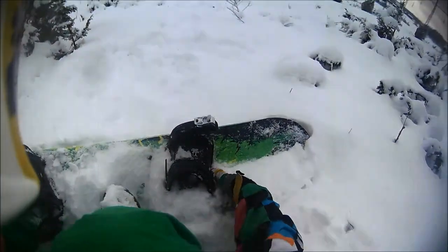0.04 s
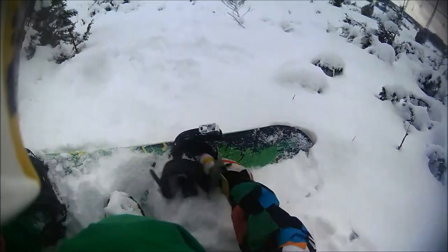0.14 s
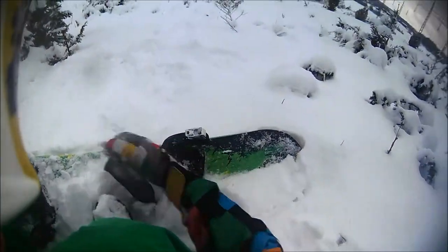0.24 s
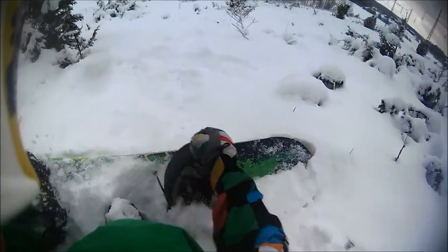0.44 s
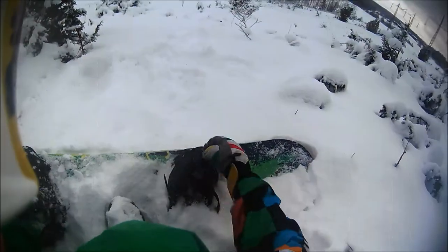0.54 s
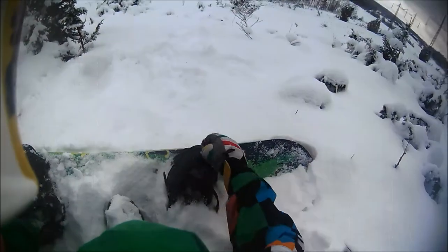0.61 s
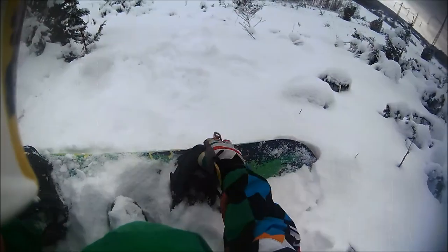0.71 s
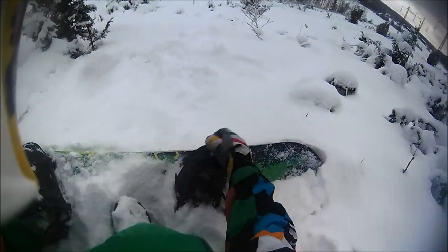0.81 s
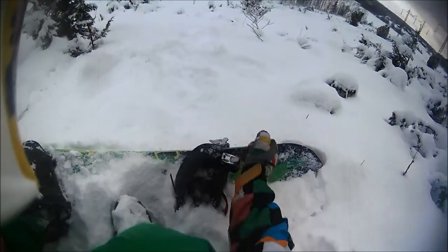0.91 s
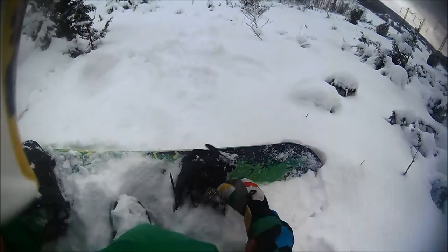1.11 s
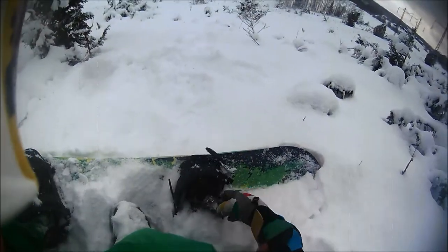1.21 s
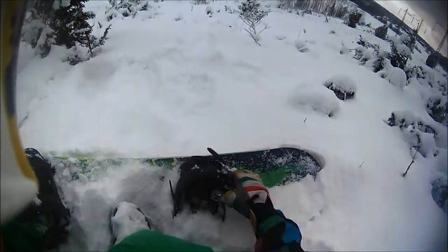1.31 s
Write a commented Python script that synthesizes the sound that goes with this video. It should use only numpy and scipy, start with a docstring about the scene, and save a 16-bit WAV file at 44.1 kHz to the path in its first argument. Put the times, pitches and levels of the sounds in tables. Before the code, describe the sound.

A snowboard binding strap ratchets briefly, then plastic clicks and a glove rustles.

```python
"""A toothed snowboard-binding strap zips through its buckle, each tooth snapping past the pawl
faster than the last. Plastic parts click and ring the buckle and frame. A glove rubs over snow and
cloth, snow crystals tick and the arm bumps softly. A jacket stirs and faint wind rumbles on a
close, dull, body-worn microphone."""
import sys
import numpy as np
from scipy import signal
from scipy.fft import rfft, irfft, next_fast_len
from scipy.io import wavfile
from scipy.ndimage import uniform_filter1d

SR = 44100
rng = np.random.default_rng(int(sys.argv[2]) if len(sys.argv) > 2 else 0)


def int16_out(signal):
    """Quantize to a 16-bit WAV file."""
    q = np.round(np.clip(np.atleast_2d(signal).T, -1, 1) * 32767)
    wavfile.write(sys.argv[1], SR, q.astype(np.int16))


N = 59535


def undb(db):
    """Decibels to gain."""
    return 10 ** (np.asarray(db) / 20)


def unit(x):
    """Scale to rms 1."""
    return x / np.sqrt(np.mean(x ** 2) + 1e-20)


def since(start_s):
    """Seconds since start_s, zero before it."""
    return np.maximum(np.arange(N) / SR - start_s, 0)


def curve(table, column=1):
    """One table column, linearly interpolated over time."""
    rows = np.array(table)
    return np.interp(np.arange(N) / SR, rows[:, 0], rows[:, column])


def colour(x, points):
    """Minimum-phase filter through (freq_hz, gain_db) points."""
    size = 2 * next_fast_len(N)
    hz, db = np.array(points, float).T
    bins_hz = np.maximum(np.arange(size // 2 + 1) * SR / size, 1)
    gain = undb(np.interp(np.log(bins_hz), np.log(hz), db))
    cepstrum = irfft(np.log(gain))
    cepstrum[1:size // 2] *= 2
    cepstrum[size // 2 + 1:] = 0
    return irfft(rfft(x, size) * np.exp(rfft(cepstrum)))[:N]


def drift(rate_hz):
    """Smooth random fluctuation, rms 1."""
    hold = int(SR / rate_hz)
    steps = np.repeat(rng.standard_normal(N)[:N // hold + 1], hold)
    return unit(uniform_filter1d(uniform_filter1d(steps, hold), hold)[:N])


def grains(rate_per_s=3100, scatter_db=0.5):
    """Friction: dense tiny slips of random sign and slightly uneven strength."""
    slips = rng.random(N) < rate_per_s / SR
    signs = rng.choice([-1, 1], N)
    return slips * signs * undb(scatter_db * np.minimum(rng.exponential(size=N), 5))


def ring(start_s, modes, rise_s):
    """Damped modes (freq_hz, level_db, t60_s) of alternating sign, building during contact; peak 1."""
    age_s = since(start_s)[:int((start_s + .3) * SR)]
    y = np.zeros(len(age_s))
    for k, (hz, db, t60_s) in enumerate(modes):
        decay = np.exp(-np.log(1000) * age_s / t60_s)
        y += (-1) ** k * undb(db) * np.sin(2 * np.pi * hz * age_s) * decay
    y *= 1 - np.exp(-age_s / rise_s)
    return np.pad(y / np.abs(y).max(), (0, N - len(y)))


def at_pitch(modes, pitch_hz):
    """Mode ratios to frequencies."""
    return [(pitch_hz * ratio, db, t60_s) for ratio, db, t60_s in modes]


def wind(swing_db=4):
    """Gusts rumble on the microphone."""
    # time_s, level_db
    levels = [(.02, -33.5), (.09, -39), (.3, -38), (.36, -36), (.43, -41), (.5, -34), (.59, -30.5),
              (.68, -43), (.92, -45), (1.1, -39), (1.35, -46)]
    # freq_hz, gain_db
    spectrum = [(15, -7.5), (35, -3.5), (70, -4), (120, -5.5), (200, -12.5), (500, -39.5)]
    rumble = unit(colour(rng.standard_normal(N), spectrum))
    return rumble * undb(curve(levels) + swing_db * drift(rate_hz=7.9))


def jacket(level_db=-46.5, swing_db=1):
    """Jacket cloth stirs in constant quiet friction."""
    # freq_hz, gain_db
    spectrum = [(60, -8.5), (150, -3.5), (280, 1.5), (450, -8), (700, -9), (1100, -16.5), (2300, -27.5),
                (3200, -33), (5000, -36.5)]
    return unit(colour(grains(), spectrum)) * undb(level_db + swing_db * drift(rate_hz=34.71))


def bumps(t60_s=0.057):
    """Soft arm bumps, each one low, quickly damped mode."""
    # start_s, peak_db, pitch_hz
    hits = [(0.352, -17.5, 73), (0.545, -12.5, 108), (0.564, -27, 91), (0.852, -32, 119), (1.091, -35, 180),
            (1.137, -22.5, 81.5), (1.299, -34.5, 136)]
    return sum(undb(db) * ring(start_s, [(hz, 0, t60_s)], rise_s=0.0015) for start_s, db, hz in hits)


def crystals(decay_s=0.002):
    """Snow crystals break under the glove in short bright noise bursts."""
    # start_s, relative_db
    ticks = [(0.272, -15), (0.277, -14), (0.296, -30), (0.301, -36), (0.355, -26), (0.376, -24),
             (0.403, -18), (.513, -25.5), (0.55, -26), (0.945, -32), (1.216, -27.5)]
    # freq_hz, gain_db
    spectrum = [(1500, -29.5), (3000, -17.5), (5000, -12), (7300, -10.5), (9000, -15.5)]
    bursts = np.zeros(N)
    for start_s, db in ticks:
        age_s = since(start_s)
        bursts += undb(db) * (age_s > 0) * np.exp(-age_s / decay_s)
    return bursts * unit(colour(rng.standard_normal(N), spectrum)) / 2


def glove(swell_exponent=0.69):
    """Each stroke swells and fades: a dull rub on snow, a brighter rustle of cloth."""
    # start_s, length_s, rub_db, rustle_db
    strokes = [(-.012, 0.11, -31.5, -45.5), (0.075, 0.2, -36.5, -49.5), (0.314, 0.07, -36.5, -37),
               (0.356, 0.076, -42.5, -33.5), (0.435, 0.12, -30, -53.5), (0.516, .1, -30, -46),
               (.587, 0.011, -28.5, -37), (0.608, .1, -54.5, -62), (0.73, 0.047, -41, -52),
               (0.933, 0.1, -40.5, -51), (1.075, 0.076, -41, -49.5), (1.182, 0.084, -37.5, -58.5),
               (1.305, 0.13, -43, -58)]
    # freq_hz, gain_db
    rub_spectrum = [(40, -28), (150, -3), (300, 2.5), (600, -1), (900, -10.5), (1400, -20), (3000, -49)]
    # freq_hz, gain_db
    rustle_spectrum = [(250, -15), (700, -0.5), (1000, -1), (1500, -3), (2400, -7), (3200, -19.5),
                       (7000, -17.5)]
    rub_gain, rustle_gain = np.zeros(N), np.zeros(N)
    for start_s, length_s, rub_db, rustle_db in strokes:
        progress = np.minimum(since(start_s) / length_s, 1)
        swell = np.abs(np.sin(np.pi * progress)) ** swell_exponent
        rub_gain += undb(rub_db) * swell
        rustle_gain += undb(rustle_db) * swell
    rub = rub_gain * unit(colour(grains(), rub_spectrum))
    rustle = rustle_gain * unit(colour(grains(), rustle_spectrum))
    return rub + rustle


def clicks(crack_re_pawl_db=-13.5, crack_decay_s=0.0011):
    """Plastic impacts: the pawl cracks and ticks, the buckle knocks, the frame rings low."""
    # The hand's grip shifts the pitches.
    # start_s, frame_hz, frame_db, buckle_hz, buckle_db, pawl_db
    hits = [(.291, 237, -19.5, 573, -9, -44), (.498, 267, -27.5, 515, -36, -54),
            (.523, 300, -16.5, 553, -6.5, -19), (0.5404, 252, -29, 620, -15.5, -37.5),
            (0.5495, 248.5, -22, 516, -28, -34), (0.5907, 302, -26.5, 459, -17.5, -38),
            (0.598, 241, -29.5, 393, -39, -66), (.746, 240.6, -35, 670, -31.5, -42.5),
            (.9735, 208, -31, 940, -31, -23), (.976, 225, -27.5, 766, -16.5, -19.5),
            (1.005, 300.3, -19.5, 1040, -31, -46), (1.0184, 320, -40, 946, -35, -53),
            (1.023, 317, -21, 513, -30.5, -67), (1.068, 294, -48, 600, -38, -58),
            (1.155, 252.4, -24, 575, -30, -48), (1.216, 310, -37, 560, -34, -39),
            (1.228, 322.7, -30, 585, -46, -48), (1.2492, 297, -33, 961, -32, -51),
            (1.285, 238, -40.5, 306, -32.5, -61)]
    # pitch_ratio, level_db, t60_s
    frame_modes = [(.78, -12, .06), (1, 0, .095), (1.16, -9, .07), (1.85, -11, .08)]
    # pitch_ratio, level_db, t60_s
    buckle_modes = [(.82, 2.5, 0.023), (1, 2, 0.033), (1.33, 0.5, 0.02), (1.75, -11, 0.027),
                    (2.4, -14, .018)]
    # freq_hz, level_db, t60_s
    pawl_modes = [(1590, 4.5, 0.004), (1834, -4, 0.017), (2175, 1.5, 0.0071), (2667, -8, 0.01),
                  (3000, -4, .009), (4710, -13, 0.0057)]
    out = np.zeros(N)
    for start_s, frame_hz, frame_db, buckle_hz, buckle_db, pawl_db in hits:
        age_s = since(start_s)
        burst = (age_s > 0) * np.exp(-age_s / crack_decay_s)
        crack = undb(crack_re_pawl_db) * rng.standard_normal(N) * burst
        out += undb(frame_db) * ring(start_s, at_pitch(frame_modes, frame_hz), rise_s=0.0017)
        out += undb(buckle_db) * ring(start_s, at_pitch(buckle_modes, buckle_hz), rise_s=0.00083)
        out += undb(pawl_db) * (ring(start_s, pawl_modes, rise_s=0.00023) + crack)
    return out


def strap(rate_jitter=.045, scatter_db=1.6, scrape_decay_teeth=1):
    """Teeth snap past the pawl at a rising rate, each followed by a short scrape."""
    # time_s, teeth_per_s
    pull_speed = [(.2, 137.6), (.225, 166), (.24, 232), (.255, 250), (.267, 323), (.28, 327), (.292, 480),
                  (.3, 525)]
    # time_s, teeth_db, scrape_db
    pull_levels = [(.19, -52, -40), (.203, -41.5, -37), (.217, -21.5, -25.5), (.249, -19, -21),
                   (.257, -8.5, -21.5), (.272, -15.5, -13), (.281, -6, -14), (.291, -14.5, -23),
                   (.297, -32, -37), (.304, -23, -44)]
    # freq_hz, gain_db
    tooth_spectrum = [(40, -37), (130, -22), (210, 1.5), (370, -0.5), (500, -4.5), (640, -4), (740, -5),
                      (950, -14.5), (1700, -20.5), (2500, -25), (3500, -44.5)]
    # freq_hz, gain_db
    scrape_spectrum = [(150, -19), (450, 23.5), (800, 2), (1200, 14.5), (1800, 11), (2500, 0), (3200, -0.5),
                       (4800, -4.5), (7000, -22.5)]
    teeth_per_s = curve(pull_speed)
    travel_teeth = np.cumsum(teeth_per_s * (1 + rate_jitter * drift(rate_hz=250))) / SR
    tooth = travel_teeth.astype(int)
    strength = undb(scatter_db * rng.standard_normal(N)[tooth])
    snaps = np.diff(tooth, prepend=0) * strength / np.sqrt(teeth_per_s)  # power independent of rate
    buzz = colour(snaps * undb(curve(pull_levels)), tooth_spectrum)
    buzz /= np.std(colour(snaps, tooth_spectrum))
    scrape_decay = np.exp(-(travel_teeth % 1) / scrape_decay_teeth)
    scrape = unit(colour(rng.standard_normal(N) * scrape_decay, scrape_spectrum))
    scrape *= undb(curve(pull_levels, column=2))
    time_s = np.arange(N) / SR
    pulling = (time_s > pull_levels[0][0]) & (time_s < pull_levels[-1][0])
    return pulling * (buzz + scrape)


def scene():
    """Close, dry mono mix: snow gives no echo."""
    return (strap() + clicks() + bumps() + glove() + crystals() + wind() + jacket())[None]


def record(dry, ceiling=.8, hiss_db=-68.5, cutoff_hz=7900):
    """The microphone rounds peaks and dulls the treble; faint hiss and a steep low-pass follow."""
    # freq_hz, gain_db
    mic_response = [(2500, 1), (3100, -6), (3600, -16), (4050, -32.5), (4600, -15.5), (5500, -13.5),
                    (7500, -11), (9000, -38)]
    # freq_hz, gain_db
    hiss_spectrum = [(2500, -32), (4200, -15), (4800, -9), (6000, 0.5), (7200, 1), (8000, -19)]
    rounded = dry[0] / (1 + (dry[0] / ceiling) ** 4) ** .25
    hiss = undb(hiss_db) * unit(colour(rng.standard_normal(N), hiss_spectrum))
    lowpass = signal.ellip(10, .2, 80, cutoff_hz, fs=SR, output="sos")
    return signal.sosfilt(lowpass, colour(rounded, mic_response) + hiss)[None]


dry = scene()
out = record(dry)
int16_out(out)
```